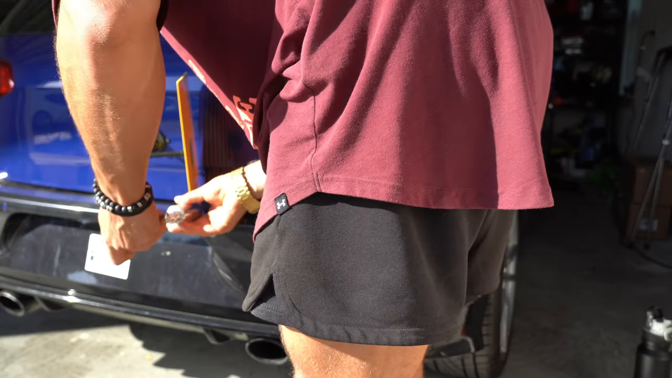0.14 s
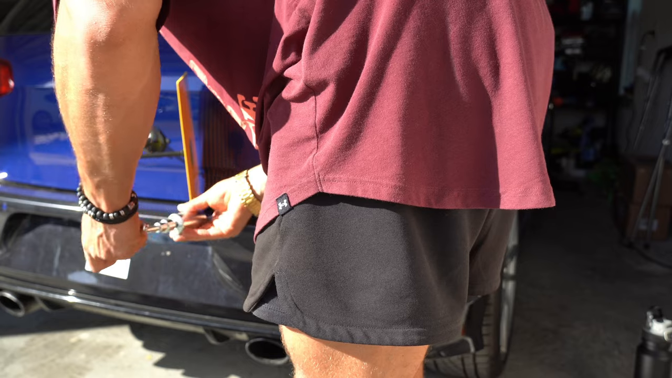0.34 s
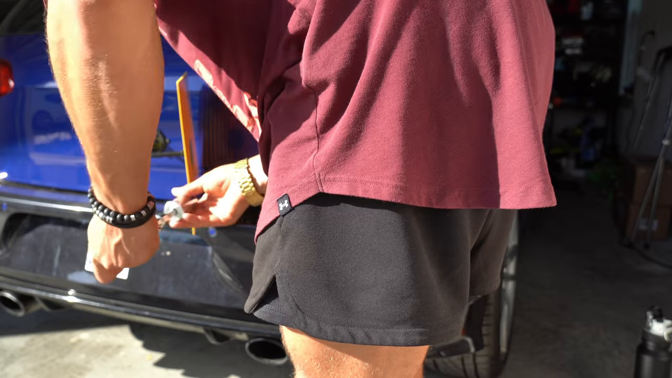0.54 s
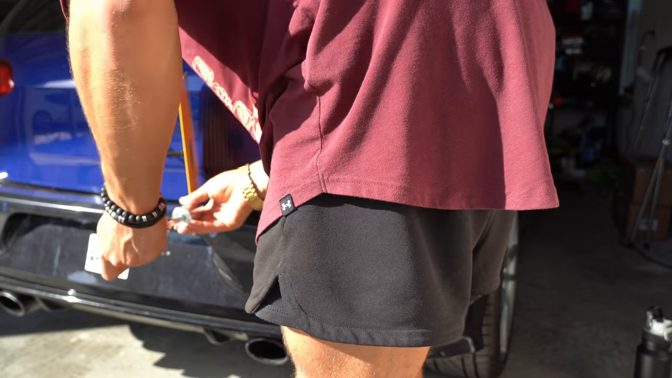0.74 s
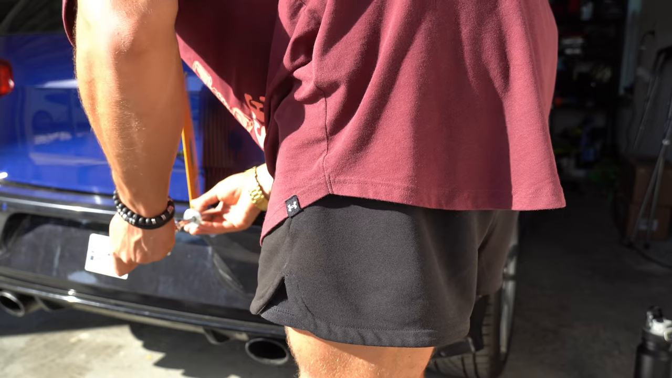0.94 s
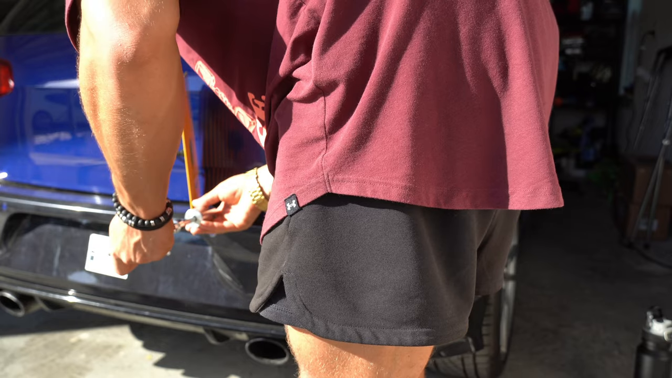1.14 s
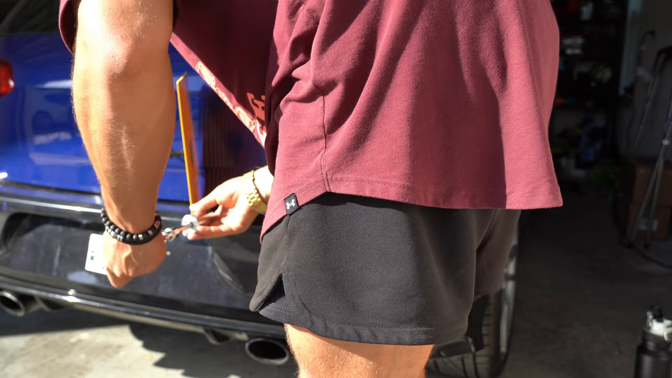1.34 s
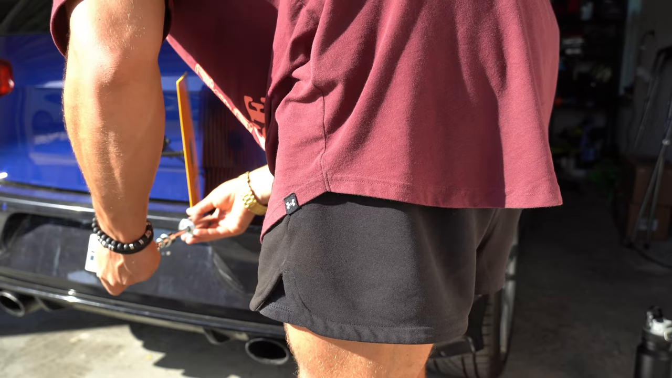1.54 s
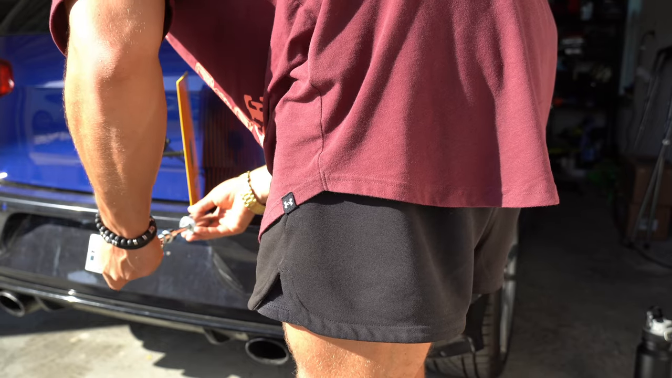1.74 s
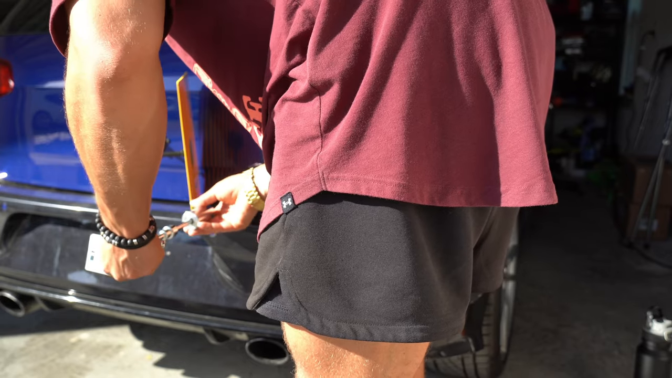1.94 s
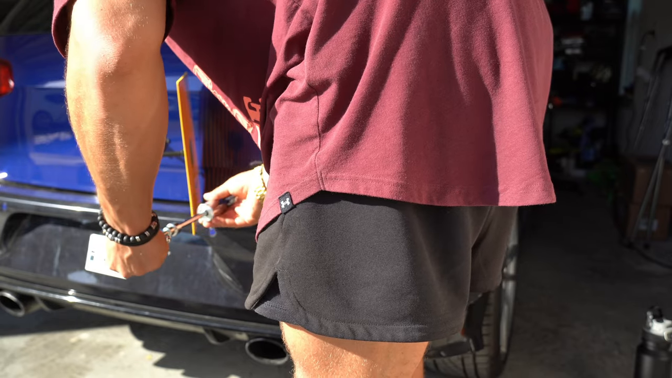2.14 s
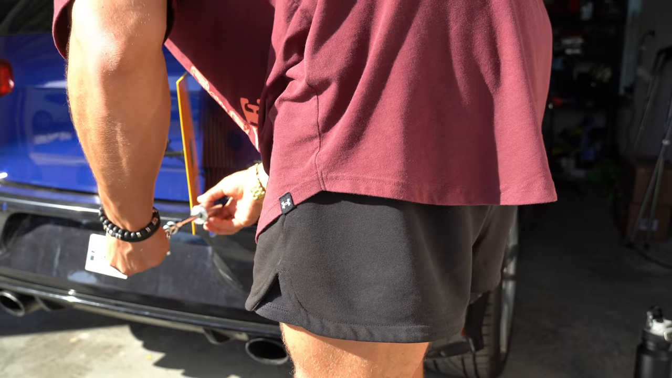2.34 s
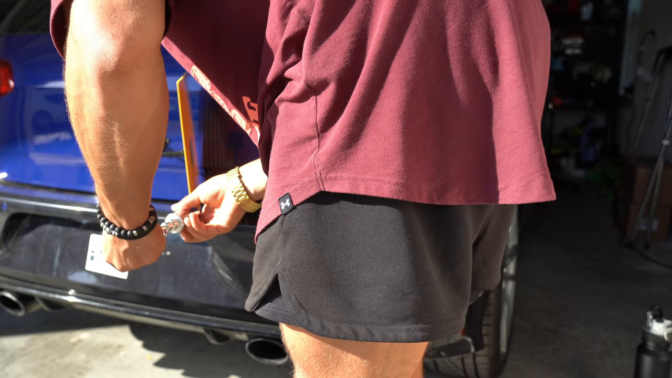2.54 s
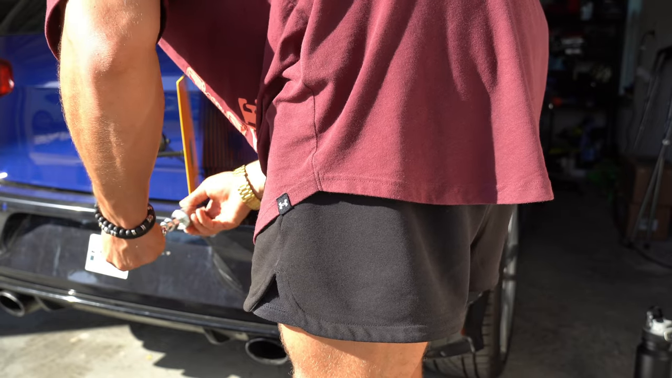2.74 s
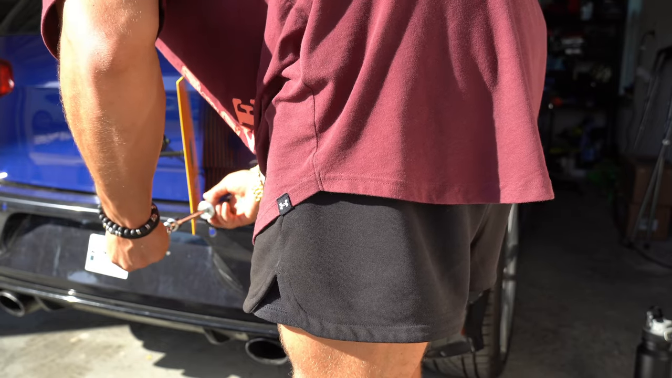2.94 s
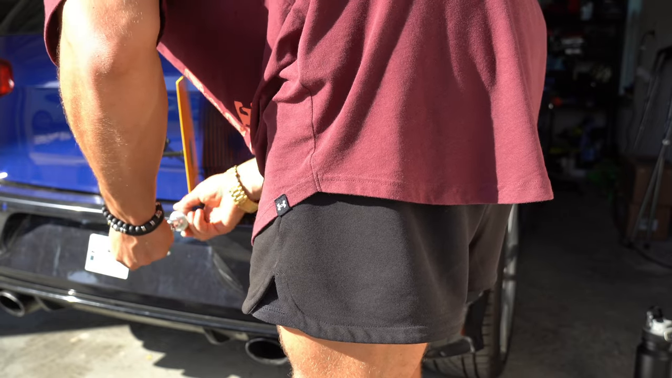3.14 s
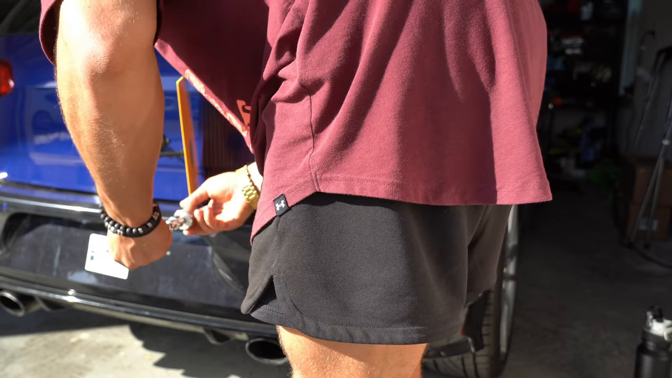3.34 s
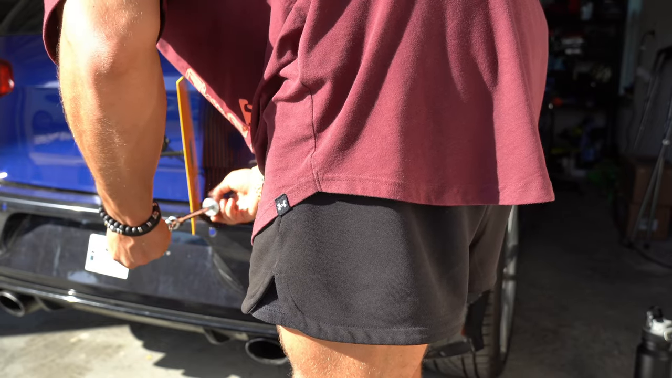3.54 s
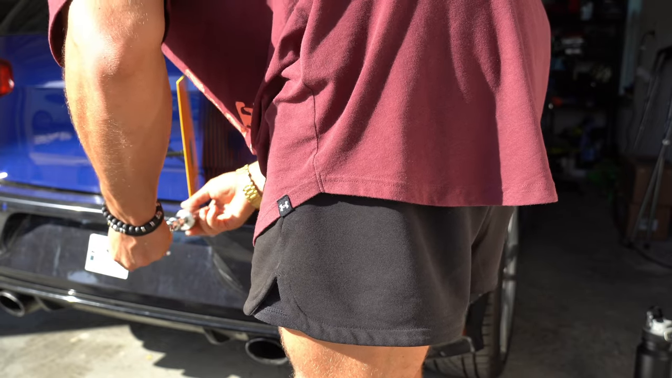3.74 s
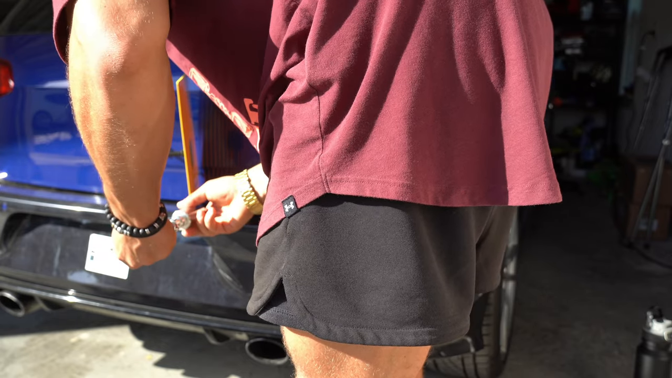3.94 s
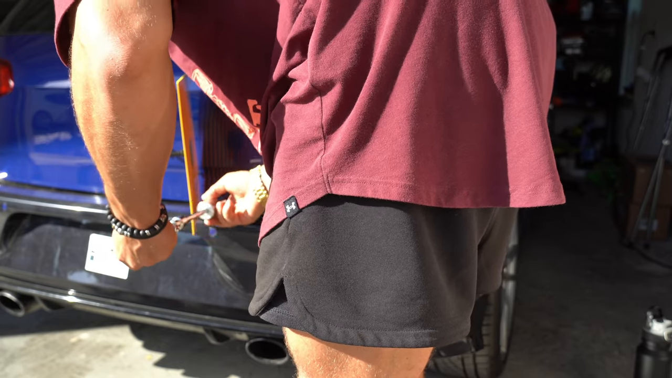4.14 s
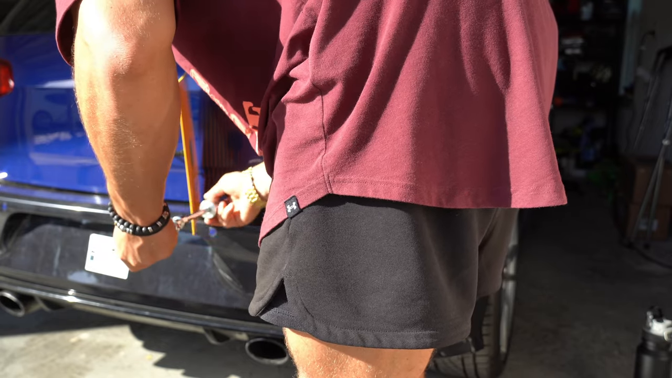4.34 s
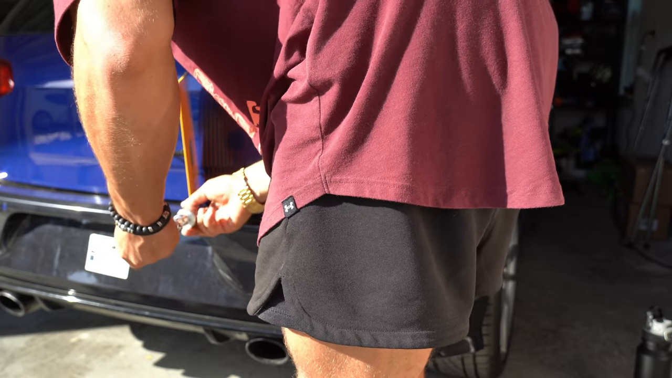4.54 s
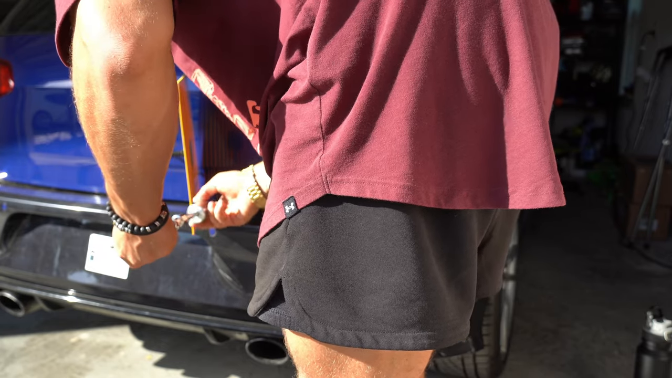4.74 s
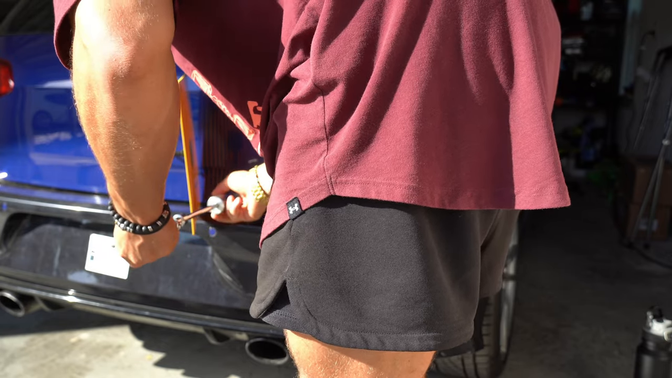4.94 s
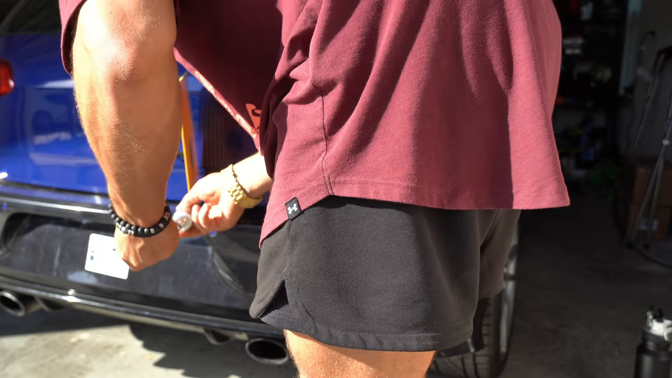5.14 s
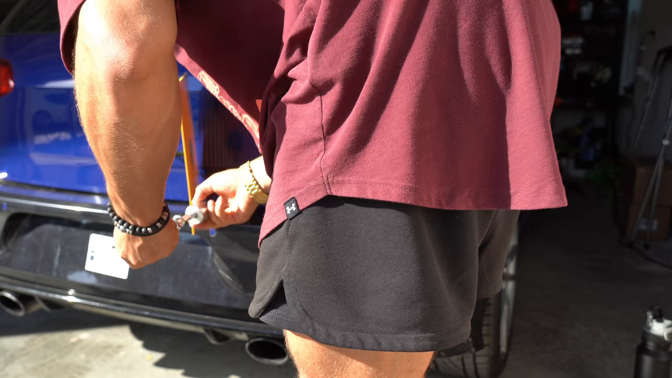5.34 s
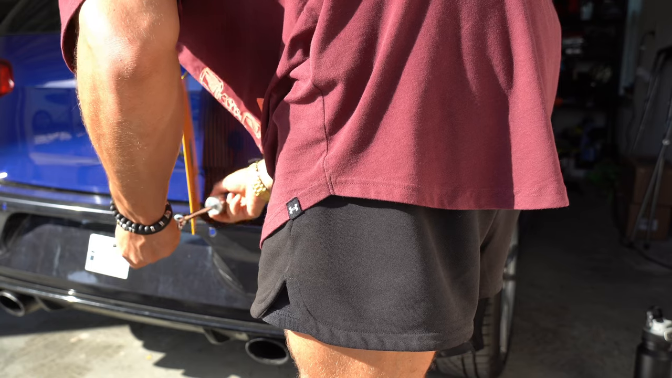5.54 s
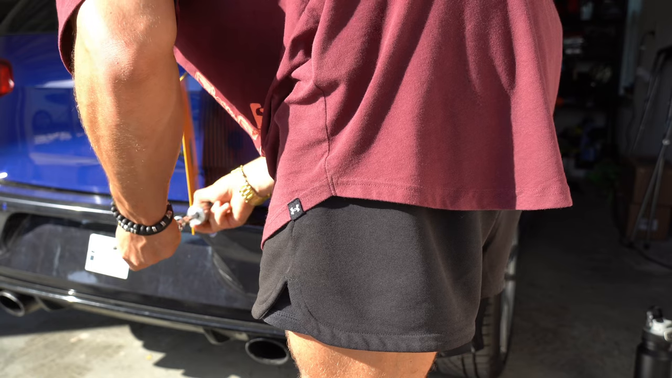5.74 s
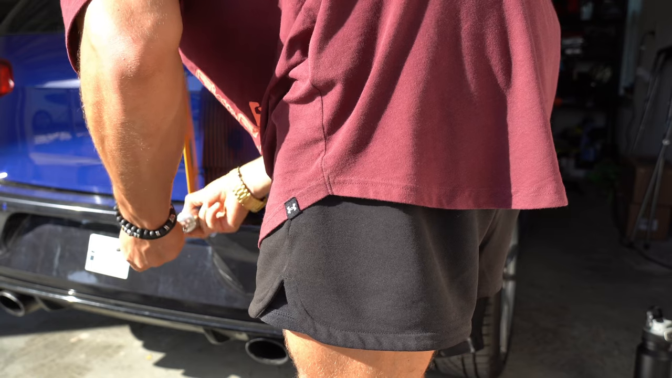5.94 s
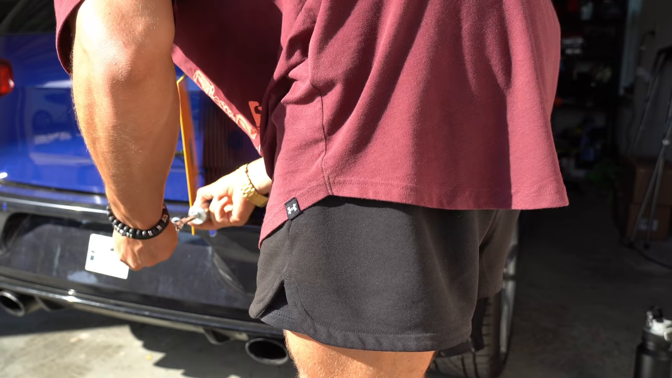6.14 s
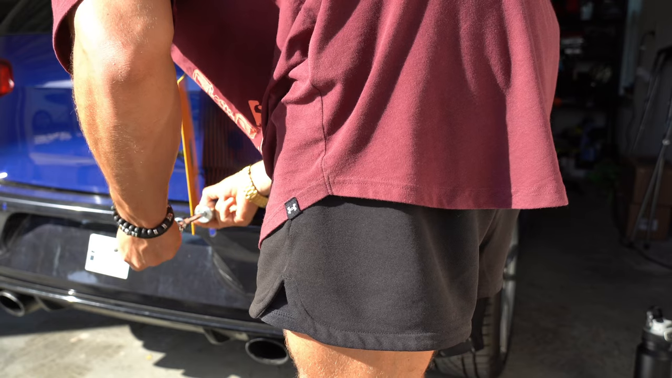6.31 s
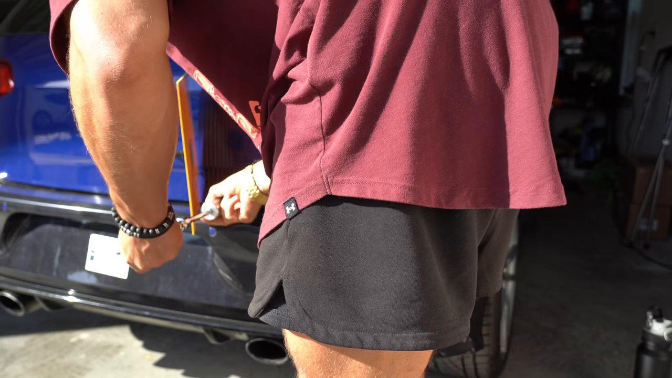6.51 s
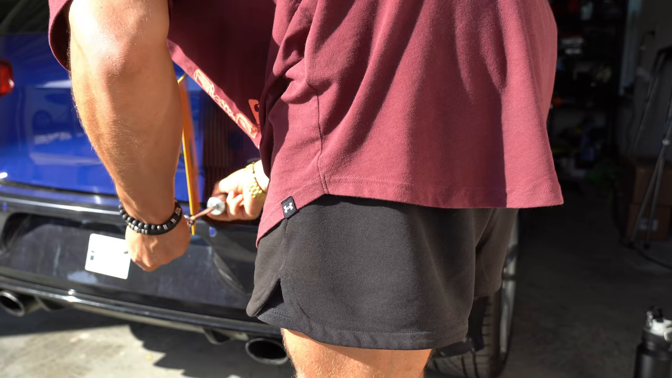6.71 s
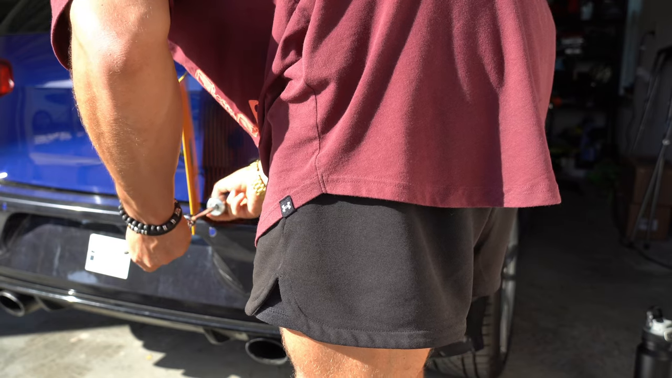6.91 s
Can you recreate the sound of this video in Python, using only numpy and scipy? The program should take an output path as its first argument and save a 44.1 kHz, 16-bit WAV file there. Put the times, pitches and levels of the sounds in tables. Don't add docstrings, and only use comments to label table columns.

```python
import sys
import numpy as np
from scipy import signal
from scipy.io import wavfile

SR = 44100
rng = np.random.default_rng(int(sys.argv[2]) if len(sys.argv) > 2 else 0)


def field_ratio(decibels):
    return 10 ** (np.asarray(decibels, dtype=float) / 20)


def pcm_store(signal):
    levels = np.round(np.clip(np.atleast_2d(signal), -1, 1) * 32767)
    wavfile.write(sys.argv[1], SR, levels.astype(np.int16).T)


N = 307377


def rms_one(x):
    return x / np.sqrt(np.mean(x ** 2) + 1e-20)


def at_hz(points, hz, axis=1):
    points = np.array(points)
    return np.interp(np.log(hz), np.log(points[:, 0]), points[:, axis])


def drift(rate):
    r = np.exp(-80 * np.pi * rate / SR)
    noise = rng.standard_normal(N // 40 + 2002)
    slow = signal.lfilter([1], [1, -2 * r, r * r], noise)[2000:]
    return np.interp(np.arange(N) / 40, np.arange(len(slow)), rms_one(slow))


def ring(clicks, hz, t60):
    r = field_ratio(-60 / (t60 * SR))
    w = 2 * np.pi * hz / SR
    return signal.lfilter([0, np.sin(w)], [1, -2 * r * np.cos(w), r * r], clicks + 1e-18)


def dying(clicks, t60):
    return signal.lfilter([1], [1, -field_ratio(-60 / (t60 * SR))], clicks + 1e-18)


def clicks_at(times, sizes):
    out = np.zeros(N)
    np.add.at(out, np.round(np.asarray(times) * SR).astype(int), sizes)
    return out


def bands(low_hz):
    white = rng.standard_normal((2, N))
    centres = 15500 * 2 ** -np.arange(0, np.log2(15500 / low_hz), 1 / 3)
    for k, hz in enumerate(centres):
        edges = [hz * 2 ** (-1 / 6), hz * 2 ** (1 / 6)]
        sos = signal.butter(2, edges, "band", fs=SR, output="sos")
        yield hz, rms_one(signal.sosfilt(sos, white[k % 2]))


# (frequency [Hz], level in a band [dB])
TRAFFIC_COLOUR = [(20, -90.5), (35, -73.5), (50, -102.5), (70, -67), (130, -67), (250, -59), (400, -59),
                  (800, -62), (1100, -62.5), (1500, -68.5), (3200, -70.5), (6300, -80), (10000, -90.5),
                  (15000, -93.5)]
# (time [s], level [dB])
TRAFFIC_SWELL = [(0, 2), (1, -1), (2, -0.5), (3.5, 0.5), (5.499, 0.5), (6.2, 0), (6.97, 1)]


def traffic():
    together = .7 * drift(2.5) + np.interp(np.arange(N) / SR, *np.transpose(TRAFFIC_SWELL))
    out = np.zeros(N)
    for hz, band in bands(low_hz=20):
        out += field_ratio(at_hz(TRAFFIC_COLOUR, hz) + together + 0.5 * drift(6)) * band
    return out


# (time [s], crack peak [dB], boom [dB], wash [dB], brightness [dB per octave])
BLOWS = [
    (0.178, -5, -17.5, -5, 3.5),
    (2.4711, -11, -17.5, -4.5, 2.5),
    (3.147, 1, -12.5, -1, 3),
    (3.7973, 1, -15, 0, 3.5),
    (4.4688, 2.7, -14, 0, 4.5),
    (5.1204, -2, -13.5, -1.5, 4),
    (5.8115, -0.2, -17, -2.5, 3.5),
]
PULL_DB = [-50, -48, -52, -56, -52, -48, -51.5]
# (start [s], length [s], scrape [dB], rumble in the panel re scrape [dB])
SLIDES = [
    (1.85, 0.22, -64, 11),
    (2.13, 0.16, -60, -14),
    (2.7, .3, -57, -4.5),
    (3.36, 0.32, -58.5, -15),
    (4.02, 0.3, -56, -8.5),
    (4.7, 0.28, -58, -11.5),
    (5.35, 0.31, -61.5, 0),
    (6.03, 0.25, -64.5, -0.5),
]


def strokes():
    scrape, rumble = np.zeros(N + SR), np.zeros(N + SR)
    t = np.arange(SR // 2) / SR
    for (s, *_), scrape_db in zip(BLOWS, PULL_DB):
        stop = round(s * SR)
        pull = field_ratio(scrape_db - 159.5 * t[:stop])[::-1]
        scrape[stop - len(pull):stop] += pull
        rumble[stop - len(pull):stop] += pull * field_ratio(-8)
    for s, length, scrape_db, rumble_db in SLIDES:
        start = round(s * SR)
        fade_db = 24.5 * (t / length) ** 5.1
        slide = np.minimum(t / .03, 1) * field_ratio(scrape_db - fade_db)
        scrape[start:start + len(t)] += slide
        rumble[start:start + len(t)] += slide * field_ratio(rumble_db)
    judder = field_ratio(1.5 * drift(22.0))
    return scrape[:N] * judder, rumble[:N] * judder


# (time [s], click [dB], ring [dB], brightness [dB per octave], thud [dB])
TICKS = [(0.6205, -44, -54, 9, -73), (0.877, -57.5, -82, 2, -66), (1.164, -58.5, -68, -8, -75),
         (1.203, -54.5, -75, -4, -54.5), (1.858, -51, -53.5, -4, -53), (1.9004, -41, -58, 4, -43.5),
         (2.1416, -52, -80, -10, -64), (2.167, -67, -83, -18, -74), (2.2464, -57, -74, -5, -52.5),
         (2.4103, -53, -65, -4, -69), (2.692, -58, -67, -7, -51), (2.02, -72, -74, -8, -52),
         (3.0521, -65, -89, -12, -75), (3.111, -58, -75, -4, -70), (3.718, -61, -72, -3, -76.5),
         (3.7555, -40, -47.5, 10, -75), (3.786, -69.5, -91, -7, -48.5), (4.4262, -40.5, -55, -2, -47),
         (5.0303, -44.5, -71, 2, -45.5), (5.488, -66, -77, -9, -64), (5.742, -54.5, -69, -6.5, -71.5),
         (5.772, -44, -55, -2.5, -52), (6.1415, -58, -75, -7, -64), (6.7388, -53, -74, -6.5, -70)]
# (frequency [Hz], level in a band [dB])
CLICK_COLOUR = [(1000, -12), (2000, -6), (3700, 7.5), (5500, 1), (7500, -12), (10000, -16.5),
                (15500, -25.5)]
# (frequency [Hz], level in a band [dB])
SCRAPE_COLOUR = [(700, 14), (1200, 3), (2200, 3.5), (3700, 7), (5500, 5.5), (8000, -15), (11000, -31.5),
                 (15500, -20.5)]


def touches(scrape):
    s, click_db, _, tilt_db, _ = np.transpose(TICKS)
    tilt_db = np.clip(tilt_db, -6, 3)
    out = np.zeros(N)
    for hz, band in bands(low_hz=700):
        bright_db = tilt_db * np.log2(max(hz, 2500) / 4000)
        chance_db = rng.normal(0, 2.5, len(s))
        start = clicks_at(s, field_ratio(click_db + at_hz(CLICK_COLOUR, hz) + bright_db - 3 + chance_db))
        touch = dying(start, 0.012) - dying(start, 0.0079)
        touch_wash = field_ratio(-8.0) * dying(start, 0.066)
        rubbing = scrape * field_ratio(at_hz(SCRAPE_COLOUR, hz) - 14 + 2.2 * drift(27))
        out += band * (touch + touch_wash + rubbing)
    return out


def uneven_contacts():
    size = field_ratio(3.5 * np.minimum(rng.exponential(1, N), 5))
    return rms_one(size * rng.choice([-1, 1], N) * (rng.random(N) < 2500 / SR))


# (frequency [Hz], level [dB], t60 [s])
ROD = [(2500, -12, .08), (3660, -3, .12), (5180, -8, .1), (5560, -7, .2), (6400, -12, .08), (7250, -4, .4),
       (7480, -5, .1), (9520, -10, .15), (12090, -12, .2), (14670, -18, .08)]


def rod(scrape, grit):
    s, _, ring_db, tilt_db, _ = np.transpose(TICKS)
    out = np.zeros(N)
    scatter = rng.normal(0, 3, (len(s), len(ROD)))
    for k, (hz, level_db, t60) in enumerate(ROD):
        dull_db = np.minimum(tilt_db, 0) * np.log2(hz / 3700)
        struck = dying(clicks_at(s, field_ratio(ring_db + level_db + scatter[:, k] + dull_db)), t60)
        rubbed = scrape * field_ratio(level_db - 1 - 16 * np.log2(hz / 3000) + 4.5 * drift(14))
        out += (struck + rubbed) * rms_one(ring(grit, hz, .028))
    return out


# (frequency [Hz], level re scrape [dB])
SQUEAK = [(720, -6.5), (1150, -10.5), (1900, -9), (2800, -16.5), (4350, -27)]


def squeak(scrape, grit):
    out = np.zeros(N)
    for hz, level_db in SQUEAK:
        patchy = field_ratio(level_db + 4.5 * drift(3.6))
        out += scrape * patchy * rms_one(ring(grit, hz, t60=0.036))
    return out


# (frequency [Hz], level [dB], t60 [s])
CRACK = [(1450, -3, 0.0082), (1800, -2, 0.0036), (2353, 2, 0.0093), (2790, 5.5, 0.015), (3810, 0, 0.017),
         (5260, 1.5, 0.0036), (5430, -2, 0.012), (6660, -5.5, 0.0032), (7630, -18.5, 0.0092),
         (9400, -23, .003), (10800, -17, 0.0013), (12400, -29, .003), (14800, -32, 0.0015)]
# (delay [s], level [dB])
ECHOES = [(.0065, -14), (0.0112, -18.5), (.020, -26), (.030, -29)]


def crack():
    s, peak_db, _, _, tilt_db = np.transpose(BLOWS)
    out = np.zeros(N)
    scatter = rng.normal(0, 1.7, (len(s), len(CRACK)))
    touch = clicks_at(s, 1.)
    grind = .45 * rng.choice([-1, 1], N) * (dying(touch, t60=.008) - dying(touch, t60=.001))
    snap = 3.2 * (clicks_at(s + .0005, 1.) - .6 * clicks_at(s + .0009, 1.))
    contact = grind + snap
    blow = np.maximum(np.cumsum(touch).astype(int) - 1, 0)
    for k, (hz, level_db, t60) in enumerate(CRACK):
        size = field_ratio(level_db + tilt_db * np.log2(hz / 4000) + scatter[:, k] - 15)
        out += (-1) ** k * ring(contact * size[blow], hz, np.clip(t60, .002, .008))
    energy = np.add.reduceat(out ** 2, np.round(s * SR).astype(int)) + 1e-12
    out = out * (4.13 * field_ratio(peak_db) / np.sqrt(energy))[blow]
    echoes = sum(field_ratio(level_db) * np.roll(out, round(delay * SR)) for delay, level_db in ECHOES)
    return out + echoes


# (frequency [Hz], level [dB], t60 [s])
PANEL = [(63, -23, 0.57), (112.4, -30.5, 0.1), (158, -45, .3), (197, -33.5, 0.75), (203, -19, 0.49),
         (254.9, -7, 0.37), (287, -9.5, 0.17), (314.3, 4, 0.16), (370, -10.5, 0.39), (396, -24.5, 0.12),
         (426, 1, 0.075), (472.6, -5.5, 0.15), (519, -4, 0.3), (598, -16, 0.58), (635, -12.5, 0.27),
         (694, -2.5, 0.22), (780, -21, 0.48), (843, -9.5, 0.2), (851, -22.5, 0.17), (900, -11.5, 0.18),
         (930, -21, 1), (1060, -21, 0.054), (1167, -15.5, 0.26), (1224, -14.5, 0.14), (1270, -31, 0.061),
         (1373, -22, 0.26), (1464, -14.5, 0.062)]


def panel(small_pushes):
    s, _, boom_db, _, _ = np.transpose(BLOWS)
    skin, shell = np.zeros(N), np.zeros(N)
    scatter = rng.normal(0, 1.8, (len(s), len(PANEL)))
    for k, (hz, level_db, t60) in enumerate(PANEL):
        push = clicks_at(s + 0.0017, field_ratio(boom_db + scatter[:, k])) + small_pushes
        sense = 1 if 200 < hz < 540 else (-1) ** (k // 2)
        mode = field_ratio(level_db) * sense * ring(push, hz, np.clip(t60, .04, .5))
        if hz > 200:
            skin += mode
        else:
            shell += mode
    skin = signal.sosfilt(signal.butter(4, 185, "high", fs=SR, output="sos"), skin)
    return signal.sosfilt(signal.butter(2, 45, "high", fs=SR, output="sos"), skin + shell)


# (frequency [Hz], level in a band [dB], t60 [s])
WASH = [(50, -47.5, 0.52), (99, -37.5, 0.56), (201, -28, 0.58), (410, -18, 0.48), (760, -21, 0.48),
        (1260, -29.5, 0.52), (1900, -31.5, 0.46), (2670, -31.5, 0.55), (3860, -34, 0.6),
        (4800, -36.5, 0.51), (6560, -37, 0.6), (8500, -45.5, 0.49), (12200, -50, .33), (15500, -57.5, .3)]


def wash():
    s, _, _, wash_db, tilt_db = np.transpose(BLOWS)
    out = np.zeros(N)
    for hz, band in bands(low_hz=40):
        bright_db = tilt_db * np.log2(max(hz, 1000) / 4000)
        start = clicks_at(s + .002, field_ratio(wash_db + at_hz(WASH, hz) + bright_db))
        late = dying(start, at_hz(WASH, hz, axis=2))
        early = 2.6 * dying(start, 0.046)
        swell_in = 1 - np.minimum(dying(1. * (start > 0), 0.0022 + 13.0 / hz), 1)
        out += band * field_ratio(2.0 * drift(37)) * (late + early) * swell_in
    return out


# (frequency [Hz], level [dB], t60 [s])
LINGER = [(1535, -42.5, 0.71), (2574, -42, 0.38), (3696, -36, 0.45), (5300, -46, .4), (6870, -36.5, 0.36)]


def linger(grit):
    s, _, _, wash_db, _ = np.transpose(BLOWS)
    out = np.zeros(N)
    scatter = rng.normal(0, 3, (len(s), len(LINGER)))
    for k, (hz, level_db, t60) in enumerate(LINGER):
        fade = dying(clicks_at(s + 0.0023, field_ratio(wash_db + level_db + scatter[:, k])), t60)
        out += fade * rms_one(ring(grit, hz, 0.04))
    return out


def scene():
    hum = traffic()
    scrape, rumble = strokes()
    grit = uneven_contacts()
    weight_on_rod = touches(scrape) + rod(scrape, grit) + squeak(scrape, grit)
    s, _, _, _, thud_db = np.transpose(TICKS)
    small_pushes = clicks_at(s, field_ratio(thud_db)) + rumble * grit / 30
    blows = crack() + panel(small_pushes) + wash() + linger(grit)
    return (hum + weight_on_rod + blows)[None]


def roll_off(x):
    return signal.sosfilt(signal.butter(12, 16670, fs=SR, output="sos"), x)


def record(dry):
    rounded = .92 * np.tanh(dry / .92)
    low_pass = signal.cheby2(10, 60, 16900, fs=SR, output="sos")
    mix = signal.sosfilt(low_pass, rounded)
    return roll_off(mix)


dry = scene()
out = record(dry)
pcm_store(out)
```